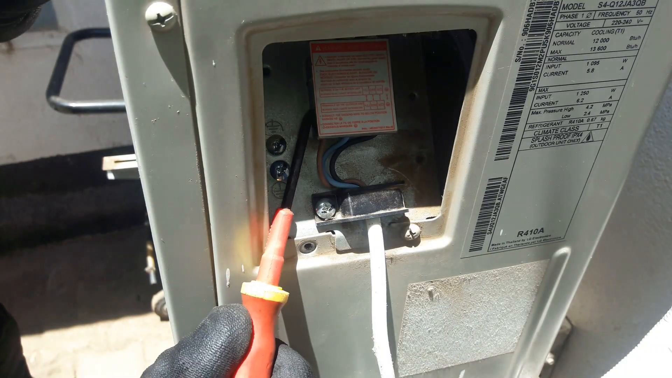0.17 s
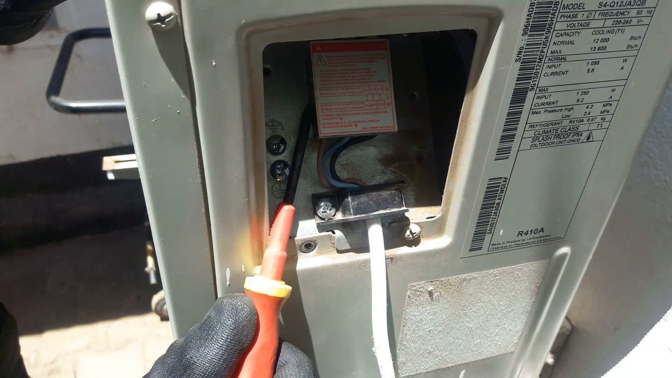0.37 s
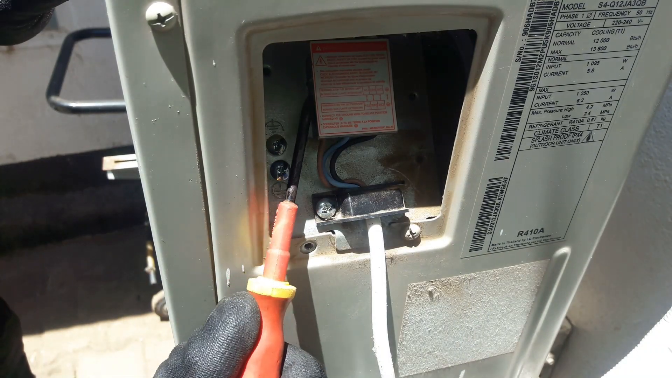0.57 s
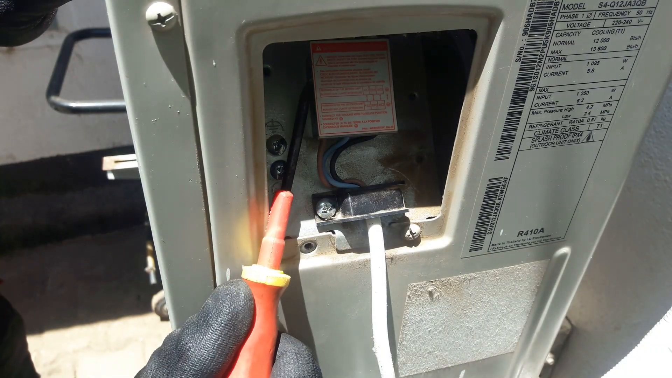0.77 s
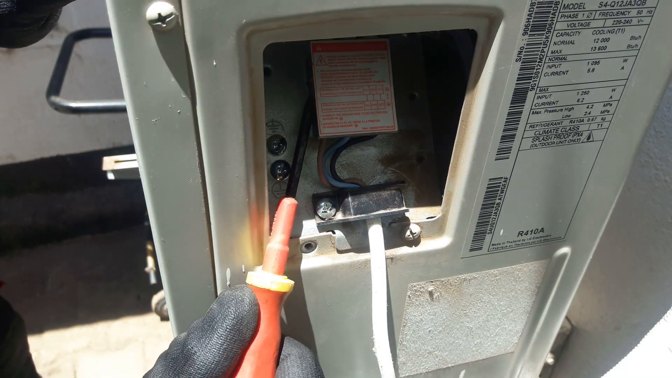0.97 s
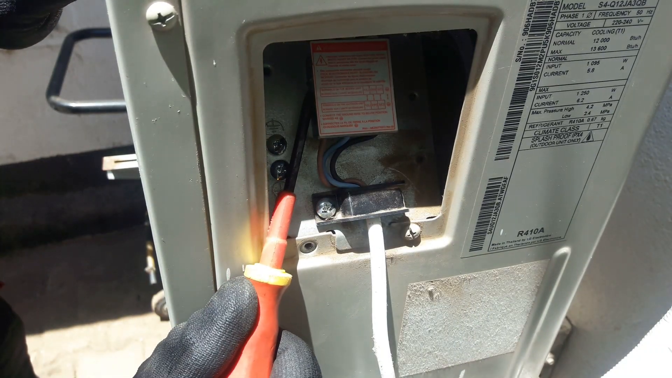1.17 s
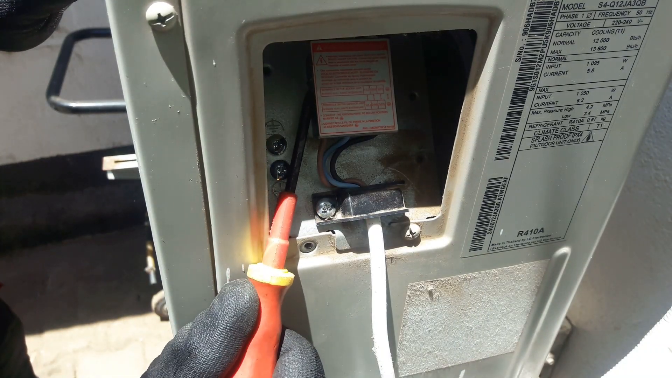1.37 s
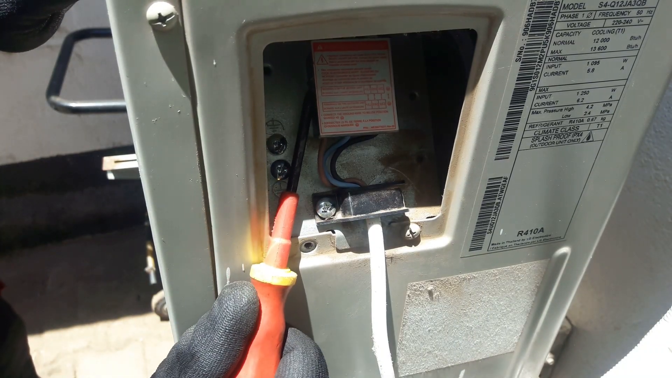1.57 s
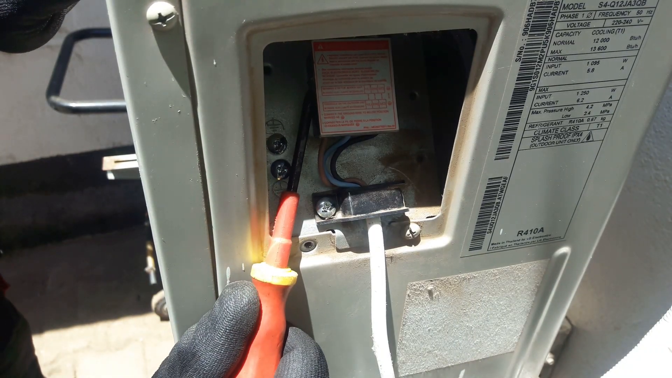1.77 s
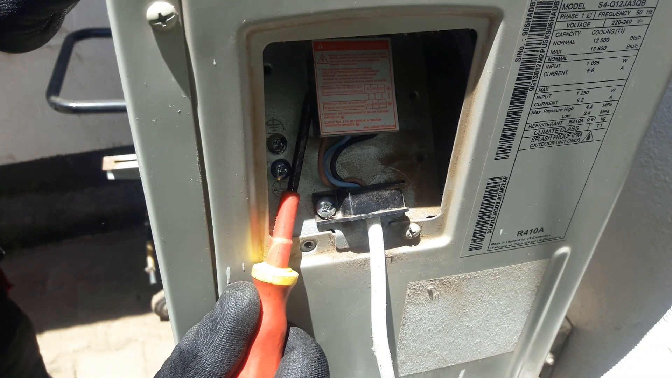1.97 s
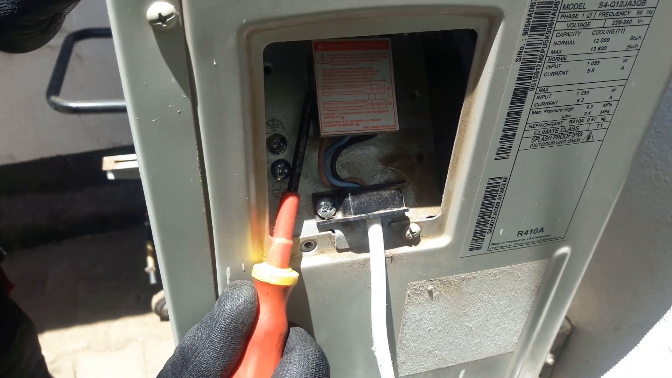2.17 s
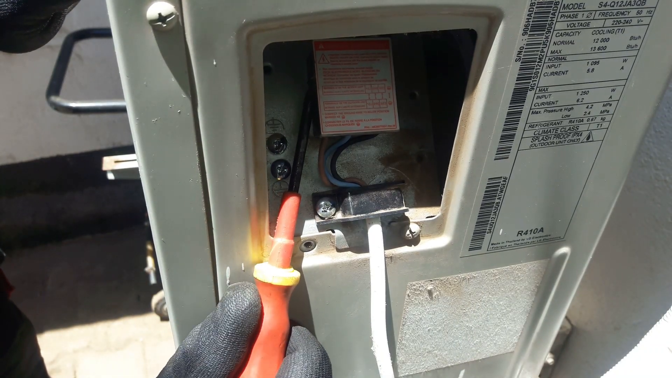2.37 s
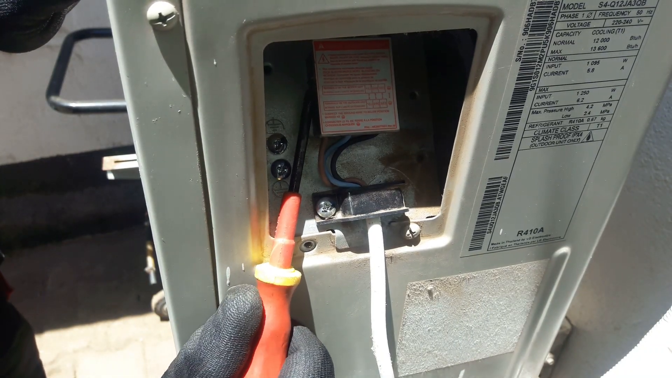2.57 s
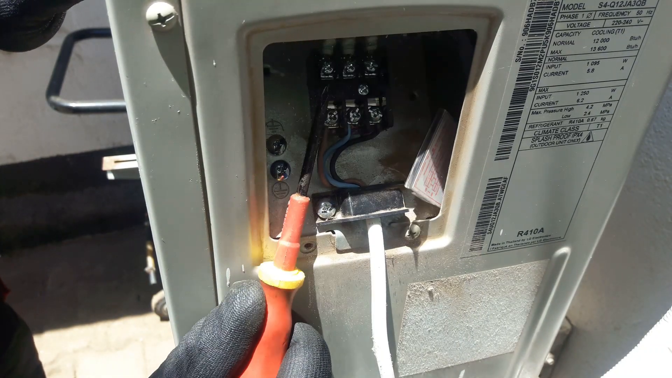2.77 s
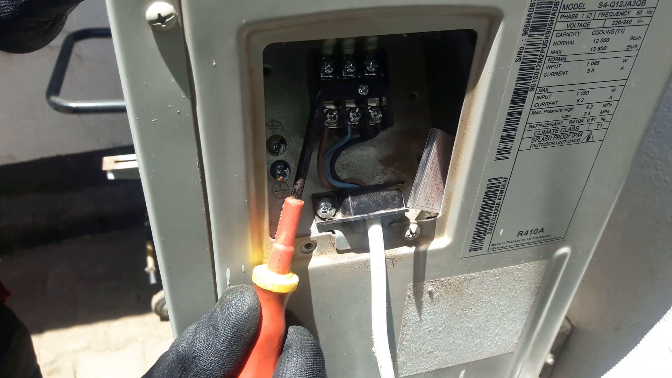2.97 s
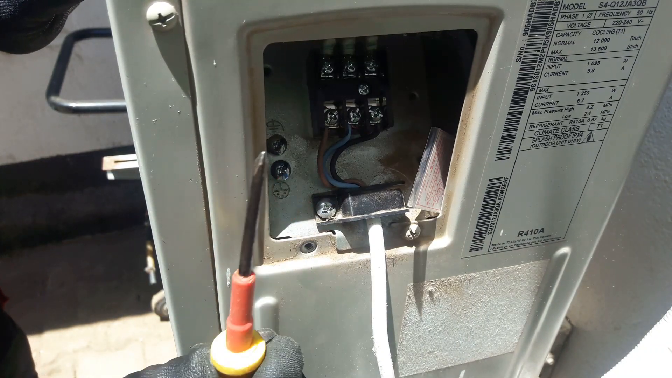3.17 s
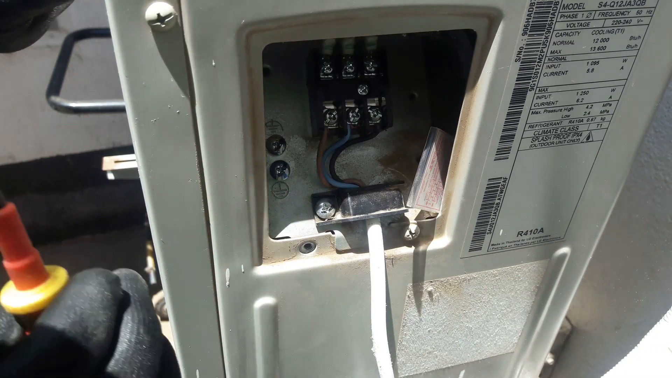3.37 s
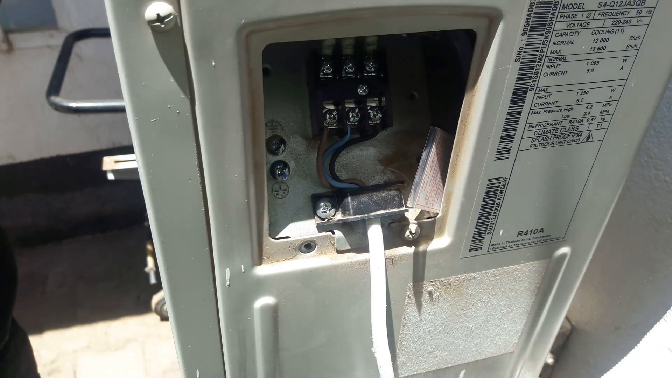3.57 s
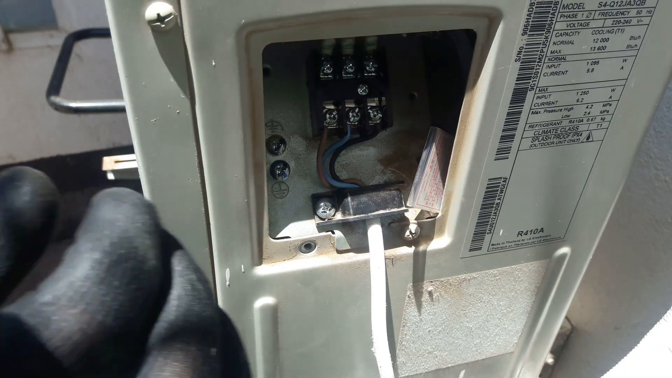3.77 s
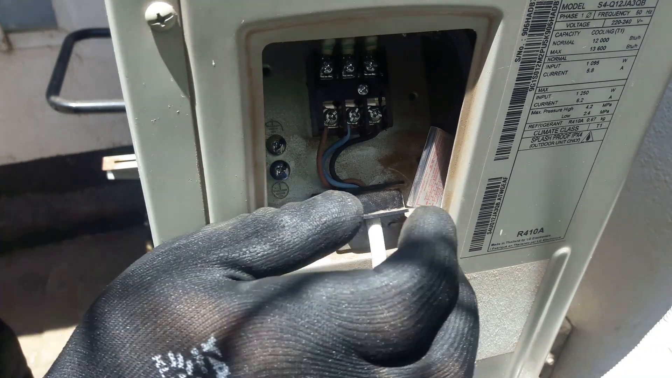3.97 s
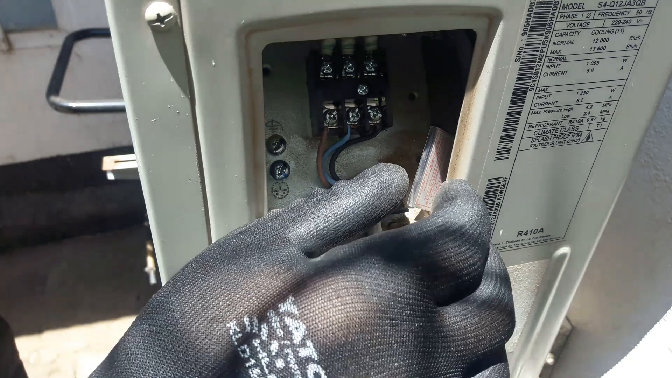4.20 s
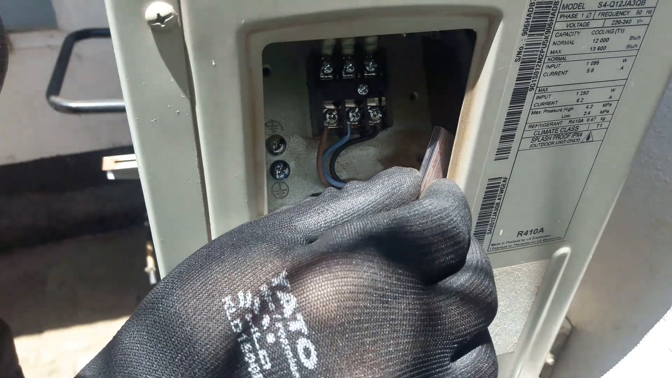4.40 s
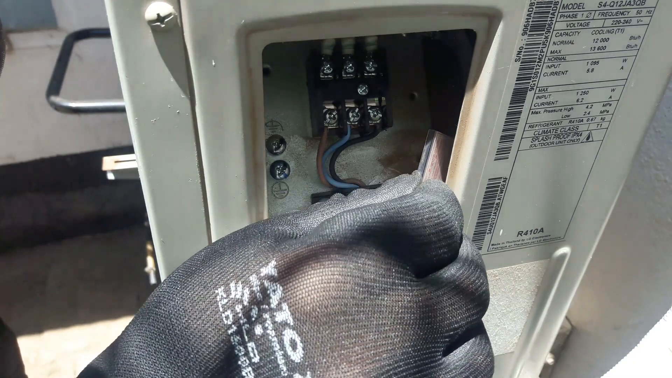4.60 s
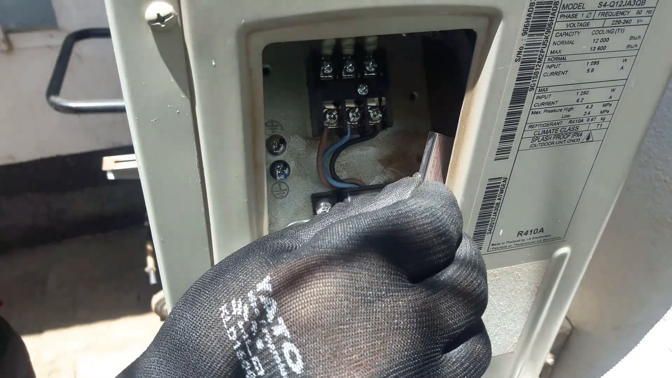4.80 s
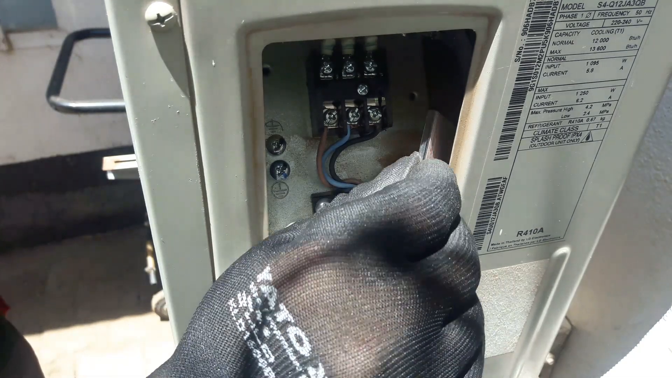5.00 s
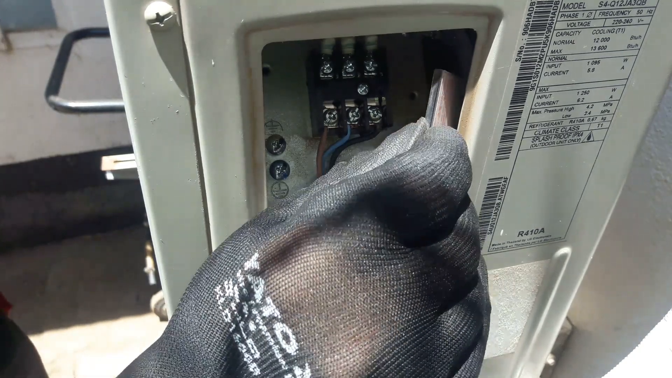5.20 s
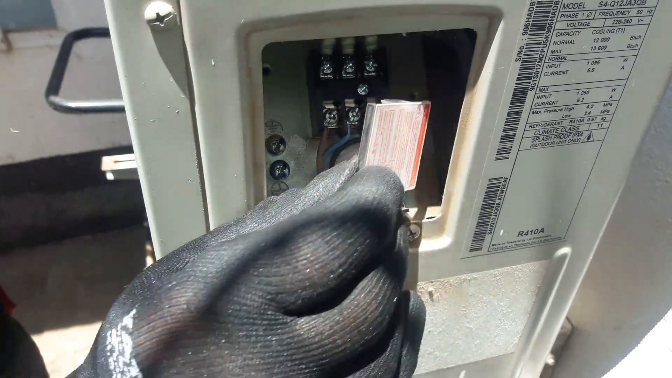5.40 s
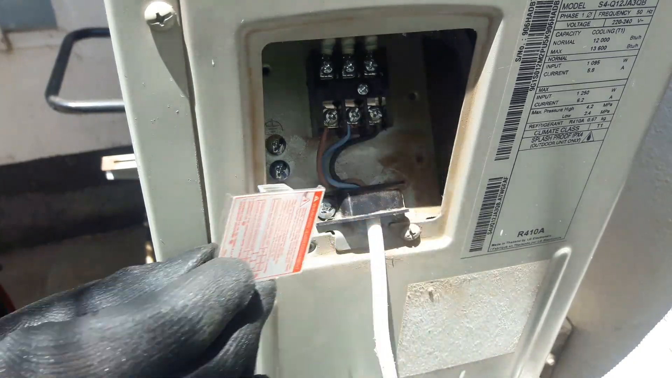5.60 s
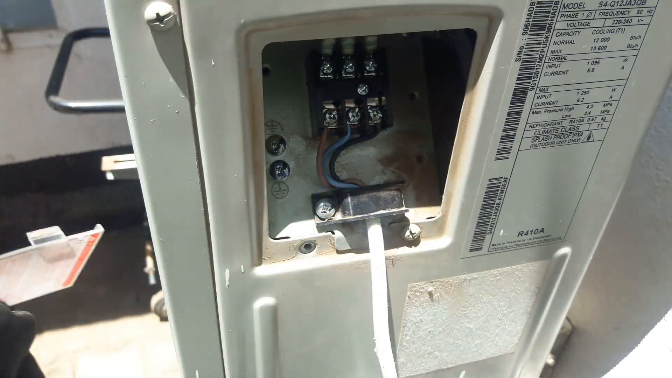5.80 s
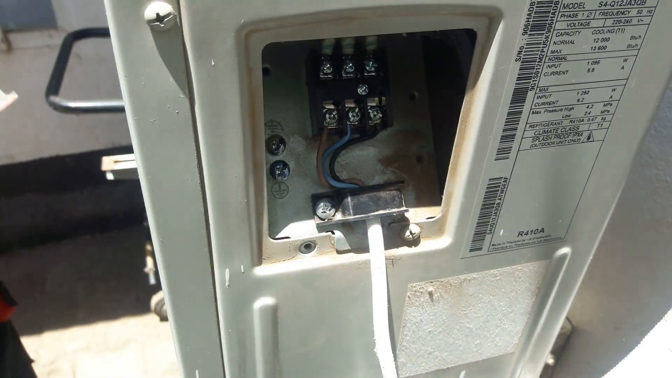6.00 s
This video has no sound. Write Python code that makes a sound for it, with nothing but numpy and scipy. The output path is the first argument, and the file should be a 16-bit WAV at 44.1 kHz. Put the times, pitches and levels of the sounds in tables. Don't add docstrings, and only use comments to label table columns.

```python
import sys
import numpy as np
from scipy import signal
from scipy.fft import rfft, irfft
from scipy.io import wavfile
from scipy.ndimage import uniform_filter1d

SR = 44100
rng = np.random.default_rng(int(sys.argv[2]) if len(sys.argv) > 2 else 0)


def gain_from_decibels(decibels):
    exponent = np.asarray(decibels, float) / 20
    return 10 ** exponent


def log_audio(samples):
    frames = np.atleast_2d(samples).T
    limited = np.clip(frames, -1, 1)
    pcm = np.round(limited * 32767).astype(np.int16)
    wavfile.write(sys.argv[1], SR, pcm)


N = 266805
SPLIT = np.array([[.5], [-.5]])

FAN_HZ, COMPRESSOR_HZ = 12.688, 60.24
FAN_ORDERS = [(3, -74, -2), (4, -48, -1), (7, -57, -2), (12, -47, -4), (14, -50, -4), (15, -54, -3),
              (19, -55, -4), (20, -58, -3), (24, -55, 2), (28, -62, 2), (42, -55, -1), (56, -58, -12),
              (68, -60, -8)]
COMPRESSOR_ORDERS = [(2, -50, -1), (3, -60, -1), (5, -51, -3), (6, -58, -1), (15, -63, -6), (18, -58, -6),
                     (20, -68, -3)]
# (frequency [Hz], waver width [Hz], level [dB], left-right [dB])
WHINE = [(223.8, 1, -56, -8), (370.6, 1.5, -52, -2), (3099.4, 3, -74, 10), (4906.5, .6, -79, -3),
         (5268, .6, -80, -10), (8367, 1, -87, 3)]
BLADE_DB = -39.5
# (time [s], change [dB], half length [s])
GUSTS = [
    (1.433, 5, 0.23),
    (2.05, 0.5, 0.18),
    (2.37, 5.5, 0.12),
    (2.65, -1.5, 0.26),
    (3.647, -4.5, 0.18),
    (4.227, -3, 0.081),
    (4.477, 7.5, 0.098),
    (5.85, 1.5, 0.16),
]
INVERTER_HZ, INVERTER_DB = (7283, 7644.5), (-68, -64.5)
# (time [s], place [0-1], nearness [dB])
STANDING = [(0, .35, 0), (.9, 0.53, -2), (1.3, 0, 1.5), (1.6, 0.5, -7), (2, 0.7, 0), (2.7, .35, 1),
            (3.9, 0.7, -3), (4.2, 0.9, 3.5), (4.75, 0.9, 1), (4.95, 0.6, -1.5), (5.3, 0.7, 0),
            (6.05, 0.7, -1.5)]
# (frequency [Hz], level [dB])
CHOP_SPECTRUM = [(300, -75), (900, -64.5), (1500, -69), (1900, -81.5), (2400, -80.5)]
# (frequency [Hz], likeness [0-1], left lead [rad], left-right [dB])
MIC_PAIR = [(40, 0.85, .05, 2), (110, 0.97, 0.058, -1), (246, 0.85, 0.044, -2), (504, 0.6, 0.056, 1.5),
            (720, 1, 1.85, -5.5), (1180, 0.6, 2.17, -2), (1800, 0, 4.05, 0), (2980, 0.06, 6.45, -1),
            (5140, 0, 5.4, -2), (10000, 0, 5.8, 1)]

# (time [s], crack [dB], ring [Hz], ring [dB])
BOUNCES = [(2.6926, -5.5, 2085, -19.5), (2.6948, -13.5, 8320, -17.5), (2.6977, -11.5, 7500, -16),
           (2.7, -18, 1450, -17), (2.702, -14.5, 3200, -18), (2.704, -18.5, 6480, -22.5),
           (2.7044, -12, 12860, -28.5), (2.708, -18.5, 940, -25), (2.717, -19.5, 2190, -18),
           (2.722, -29.5, 1500, -19.5), (2.727, -15.5, 3240, -23.5), (2.737, -24.5, 610, -28),
           (2.741, -15, 2270, -20.5)]
# (frequency [Hz], level [dB])
CRACK_SPECTRUM = [(60, -27.5), (250, 4.5), (1500, 1.5), (3500, 0), (4200, -7), (7000, -7.5), (9500, -15),
                  (13000, -7), (16000, -24.5)]
# (frequency [Hz], level [dB], t60 [s])
BOX_MODES = [(130, -13, 0.11), (188, -22.5, 0.065), (244, -2.5, 0.13), (301, 0, 0.083), (394, -1.5, 0.076),
             (500, -5, .12), (621, -8, .12), (700, -9.5, 0.11), (910, -8.5, 0.076), (1097, -23, 0.13),
             (1227, -16.5, 0.098), (1500, -8, 0.036), (1814, -14.5, 0.1)]
THUMP_DB, THUMP_SHARE = -17, 0.6
# (time [s], crack [dB], lower ring [dB], upper ring [dB])
RATTLE = [(2.73, -22, -25, -38), (2.746, -28, -28, -37), (2.7619, -19.5, -33, -30), (2.77, -30, -33, -32),
          (2.785, -34, -44, -48), (2.813, -28, -35, -35), (2.816, -34, -35, -34), (2.82, -34, -38, -37),
          (2.85, -43, -50, -43), (2.864, -42, -44, -46), (2.878, -39, -47, -44)]
COVER_HZ = 4780, 5750
# (time [s], level [dB], frequency [Hz], t60 [s])
BOOMS = [
    (2.694, -8, 188, 0.093),
    (2.694, -28, 244, 0.12),
    (2.737, -14, 130, 0.058),
    (2.78, -14.5, 147, 0.062),
]

# (level [dB], centre [Hz], spread [octaves], rise [s], t60 [s])
TAP_PARTS = [(-1.5, 1580, 0.51, 0.00056, 0.048)]
SNAP_PARTS = [(-4.5, 3200, .2, 0.00078, 0.032), (-2.5, 3000, 1, 0.00027, 0.021)]
TIP_PARTS = [(-0.25, 7080, .45, 0.00043, 0.035), (-2, 12500, .4, 0.00058, 0.02)]
THUD_PARTS = [(0, 178, 0.64, 0.0046, 0.19)]
KNOCK_PARTS = [(-0.5, 590, 1, 0.0028, 0.12), (-4.5, 1200, 0.63, 0.0017, 0.063),
               (-11.5, 2100, .25, 0.00072, 0.04)]
# (time [s], tap [dB], snap [dB], tip [dB])
TAPS = [
    (.1216, -33.5, -31.5, -60),
    (.2657, -32, -39, -56),
    (.587, -35, -36.5, -53),
    (.8955, -32.5, -28.5, -50),
    (1.077, -38, -31, -37.5),
    (5.044, -41, -52, -48),
]
# (time [s], thud [dB], knock [dB])
KNOCKS = [
    (.055, -29.5, -34.5),
    (.14, -45, -32.5),
    (.209, -29, -27.5),
    (.9785, -37, -34.5),
    (1.577, -47, -43),
    (1.749, -26, -27.5),
    (1.759, -40, -32.5),
    (1.769, -50, -36.5),
    (1.786, -47, -38),
]
# (time [s], level [dB], centre [Hz], spread [octaves])
TICKS = [
    (.033, -59, 12100, .3),
    (.647, -55, 13500, .25),
    (.694, -50, 13000, .25),
    (.706, -58, 13500, .3),
    (.976, -56, 13000, .4),
    (1.37, -50, 10500, 1.1),
    (2.179, -34, 14200, 0.33),
    (3.164, -43, 5500, 0.79),
    (3.194, -38, 5460, 1),
    (5.24, -45, 4000, .9),
]
TICK_RISE_S, TICK_T60_S = 0.00046, .02
# (time [s], level [dB], frequency [Hz])
PINGS = [
    (1.29, -66, 6900),
    (1.53, -64, 6850),
    (1.76, -64, 6820),
    (2.42, -63, 6800),
    (5.0445, -47, 5900),
]
PING_OCTAVES, PING_RISE_S, PING_T60_S = .03, 0.0015, .08
# (time [s], level [dB], centre [Hz], t60 [s])
RUBS = [(.845, -53, 12000, 0.18), (.89, -59, 12100, .15), (1.46, -60, 12000, .15),
        (2.155, -50, 12000, 0.28), (2.176, -39, 6900, 0.16), (2.2, -43, 3980, 0.36),
        (3.14, -58.5, 11000, .23), (4.029, -48, 6700, .23), (4.17, -54.5, 12000, .23),
        (4.6, -62, 12000, 1.9), (4.88, -59, 12000, .8), (5.1, -57, 12000, .37), (5.27, -60.5, 12500, 1.2),
        (6.004, -47.5, 5830, .4)]
RUB_RISE_SHARE, RUB_SPREAD_HZ = 0.044, 6300

# (frequency [Hz], density [dB per Hz])
AIR_SPECTRUM = [(30, -29), (70, -22), (115, -3.5), (259, -10.5), (340, -14.5), (569, -10.5), (1160, -23.5),
                (1590, -22.5), (3140, -29.5), (4530, -38.5), (7600, -39.5), (9220, -53.5), (12000, -49.5),
                (15700, -53.5)]
AIR_DB = -38

REST_DB, DUCK_DB, NOTCH_DB = -1.32, -10, -2.5
DUCK_S, NOTCH_AT_S, RELEASE_AT_S, RELEASE_S = 0.12, 3.21, 3.96, 0.068
HISS_DB = -79.5
EDGE_HZ = 15720


def evened(x):
    return x / np.sqrt(np.mean(x ** 2) + 1e-20)


def read(points, hz, axis=1):
    table = np.transpose(points)
    return np.interp(np.log(hz + 1), np.log(table[0] + 1), table[axis])


def add(mix, s, sound):
    part = mix[:, round(s * SR):][:, :sound.shape[1]]
    part += sound[:, :part.shape[1]]


def drift(rate_hz):
    knots = rng.standard_normal(400)
    return np.interp(np.arange(N) / SR * rate_hz, np.arange(400), knots)


def tone(hz, db, pan_db, waver_hz=0.079, flutter_db=3.0):
    phase = 2 * np.pi * (np.cumsum(hz + waver_hz * drift(5.5)) / SR + rng.random())
    lead = read(MIC_PAIR, hz, axis=2) * SPLIT
    level_db = db + flutter_db * drift(6.5 + hz / 500) + pan_db * SPLIT
    return np.sqrt(2) * gain_from_decibels(level_db) * np.sin(phase + lead)


def hum():
    t = np.arange(N) / SR
    blade_db = BLADE_DB + sum(db * np.exp(-((t - s) / half_s) ** 2) for s, db, half_s in GUSTS)
    out = tone(8 * FAN_HZ, blade_db, -1.2, .05, .3)
    for shaft_hz, orders in ((FAN_HZ, FAN_ORDERS), (COMPRESSOR_HZ, COMPRESSOR_ORDERS)):
        for k, db, pan_db in orders:
            out += tone(round(k) * shaft_hz, db, pan_db)
    s, place, near_db = np.transpose(STANDING)
    angle = np.pi / 2 * np.clip(np.interp(t, s, place), 0, 1)
    near_db = np.interp(t, s, near_db)
    shares = np.cos(angle), np.sin(angle)
    for hz, db, share, pan_db in zip(INVERTER_HZ, INVERTER_DB, shares, (-7, 1.5)):
        out += share * tone(hz, db + near_db, pan_db, 3, 3)
    for hz, waver_hz, db, pan_db in WHINE:
        out += tone(hz, db, pan_db, waver_hz, 4.2)
    return out


def chop():
    k = np.arange(24, 190)
    orders = np.zeros((2, 4096), complex)
    real, imag = rng.standard_normal((2, 2, len(k)))
    orders[:, k] = (real + 1j * imag) * gain_from_decibels(read(CHOP_SPECTRUM, k * FAN_HZ))
    pattern = 4096 * np.fft.ifft(orders).real
    place = np.arange(N) / SR * FAN_HZ % 1 * 4095
    return np.array([np.interp(place, np.arange(4096), p) for p in pattern])


def band_db(hz, centre_hz, octaves):
    return -15 * np.log10(1 + (np.log2((hz + 1) / centre_hz) / octaves) ** 2)


def burst(colour_db, rise_s, t60_s, lag_s):
    count = 2 * len(colour_db) - 2
    t, hz = np.arange(count) / SR, np.fft.rfftfreq(count, 1 / SR)
    a, b = rfft(rng.standard_normal((2, count))) * gain_from_decibels(colour_db)
    same = 1 - 0.71 / (1 + (500 / (hz + 1)) ** 2)
    right = (same * a + np.sqrt(1 - same ** 2) * b) * np.exp(-2j * np.pi * hz * lag_s)
    envelope = (1 - np.exp(-t / max(rise_s, 1e-4))) * gain_from_decibels(-60 * t / t60_s)
    return evened(irfft([a, right])), envelope


def bounce(crack_db, ring_hz, ring_db, thump_db):
    t, hz = np.arange(8192) / SR, np.fft.rfftfreq(8192, 1 / SR)
    lag_s = .00013
    dulling_db = 0.65 * min(crack_db + 6, 0)
    colour_db = read(CRACK_SPECTRUM, hz) + dulling_db * np.clip(hz / 4000 - 1.8, 0, 1)
    noise, shape = burst(colour_db, .0001, .012, lag_s)
    dull, tail = burst(colour_db - 5 * np.log2(1 + hz / 2000), .003, .1, lag_s)
    crack = gain_from_decibels(crack_db) * (noise * shape + gain_from_decibels(-9.0) * dull * tail)

    noise, shape = burst(2 * band_db(hz, ring_hz, 300 / ring_hz), .0003, .02, lag_s)
    ring_tone = np.sin(2 * np.pi * ring_hz * t + 1.2 * SPLIT)
    ring = gain_from_decibels(ring_db) * shape * (0.24 * noise + ring_tone)

    noise, shape = burst(band_db(hz, 450, 1.1), .002, .07, lag_s)
    spot_db = 2 * rng.standard_normal(len(BOX_MODES))
    box = 0
    for (f, db, t60_s), hit_db in zip(BOX_MODES, spot_db):
        onset = 1 - np.exp(-t * f / 1.6)
        box = box + gain_from_decibels(db + hit_db - 60 * t / t60_s) * np.sin(2 * np.pi * f * t) * onset
    return crack + ring + gain_from_decibels(thump_db) * (gain_from_decibels(1.5) * box + gain_from_decibels(-11.5) * noise * shape)


def boom(db, hz, t60_s):
    t = np.arange(8192) / SR
    envelope = gain_from_decibels(db - 60 * t / t60_s - SPLIT) * (1 - np.exp(-t / 0.0031))
    return -envelope * np.sin(2 * np.pi * hz * t)


def cover():
    mix = np.zeros((2, N))
    for s, crack_db, *ring in BOUNCES:
        add(mix, s, bounce(crack_db, *ring, THUMP_DB + THUMP_SHARE * crack_db))
    for s, crack_db, *ring_db in RATTLE:
        thump_db = THUMP_DB + THUMP_SHARE * crack_db
        for hz, db in zip(COVER_HZ, ring_db):
            add(mix, s, bounce(crack_db - 3, hz, db, thump_db - 3))
    for s, *row in BOOMS:
        add(mix, s, boom(*row))
    return mix


def touch(db, centre_hz, octaves, rise_s, t60_s):
    size = 4096 if t60_s < .13 else 16384 if t60_s < .45 else 32768
    colour_db = 2.83 * band_db(np.fft.rfftfreq(size, 1 / SR), centre_hz, octaves)
    noise, shape = burst(colour_db, rise_s, t60_s, .00004)
    ring_gain = 2.14 * np.exp(-rise_s / 0.00098 - octaves / 0.51)
    ring = ring_gain * np.sin(2 * np.pi * centre_hz * np.arange(size) / SR)
    return gain_from_decibels(db) * shape * (noise + ring)


def hand():
    mix = np.zeros((2, N))
    for rows, things in ((TAPS, (TAP_PARTS, SNAP_PARTS, TIP_PARTS)), (KNOCKS, (THUD_PARTS, KNOCK_PARTS))):
        for s, *levels_db in rows:
            for db, parts in zip(levels_db, things):
                for part_db, *part in parts:
                    add(mix, s, touch(db + part_db, *part))
    for s, *row in TICKS:
        add(mix, s, touch(*row, TICK_RISE_S, TICK_T60_S))
    for s, *row in PINGS:
        add(mix, s, touch(*row, PING_OCTAVES, PING_RISE_S, PING_T60_S))
    for s, db, hz, t60_s in RUBS:
        add(mix, s, touch(db, hz, RUB_SPREAD_HZ / hz, RUB_RISE_SHARE * t60_s, t60_s))
    return mix


def air():
    frames, hz = N // 512 + 5, np.fft.rfftfreq(2048, 1 / SR)
    a, b, c, d, patches = rng.standard_normal((frames, 1025, 5)).T
    patches = uniform_filter1d(patches, size=20, axis=0)
    patches = evened(uniform_filter1d(patches, size=8, axis=1))
    same, lead, pan_db = (read(MIC_PAIR, hz, axis=k)[:, None] for k in (1, 2, 3))
    same = np.clip(same, 0, 1)
    left = a + 1j * b
    right = (same * left + np.sqrt(1 - same ** 2) * (c + 1j * d)) * np.exp(-1j * lead)
    z = np.array([left * gain_from_decibels(pan_db / 2), right * gain_from_decibels(-pan_db / 2)])
    z *= gain_from_decibels(read(AIR_SPECTRUM, hz)[:, None] + 1.05 * patches)
    wash = signal.istft(z, nperseg=2048, noverlap=1536)[1][:, :N]
    return gain_from_decibels(AIR_DB + drift(3.24) / 2) * evened(wash)


def duck_db():
    t = np.arange(N) / SR
    fall = 1 - np.exp(-(np.maximum(t - BOUNCES[0][0], 0) / DUCK_S) ** 2)
    notch = .5 + .5 * np.tanh((t - NOTCH_AT_S) / 0.025)
    held = .5 + .5 * np.tanh((RELEASE_AT_S - t) / (2 * RELEASE_S))
    return REST_DB + (DUCK_DB * fall + NOTCH_DB * notch) * held


def scene():
    return hum() + chop() + cover() + hand() + air()


def low_pass(x):
    return signal.sosfilt(signal.butter(12, 16330, fs=SR, output="sos"), x)


def record(dry):
    ducked = dry * gain_from_decibels(duck_db())
    ducked += gain_from_decibels(HISS_DB) * rng.standard_normal(dry.shape)
    edge = signal.firwin(511, EDGE_HZ, window=("kaiser", 8), fs=SR)[None]
    limited = .6 * np.tanh(ducked / 0.58)
    return low_pass(signal.oaconvolve(limited, edge, "same"))


dry = scene()
out = record(dry)
log_audio(out)
```